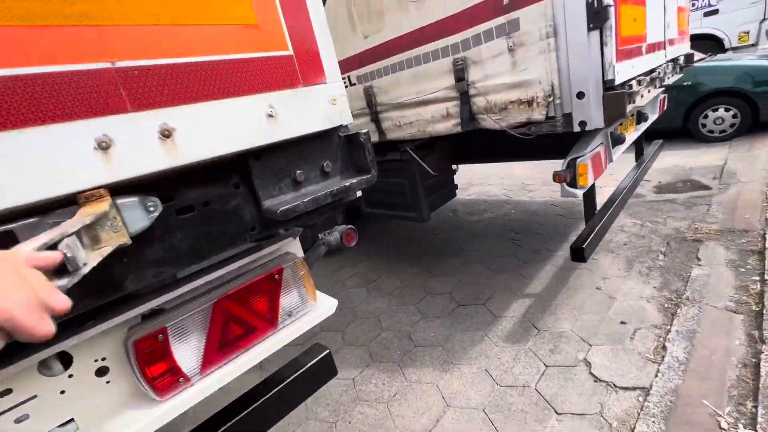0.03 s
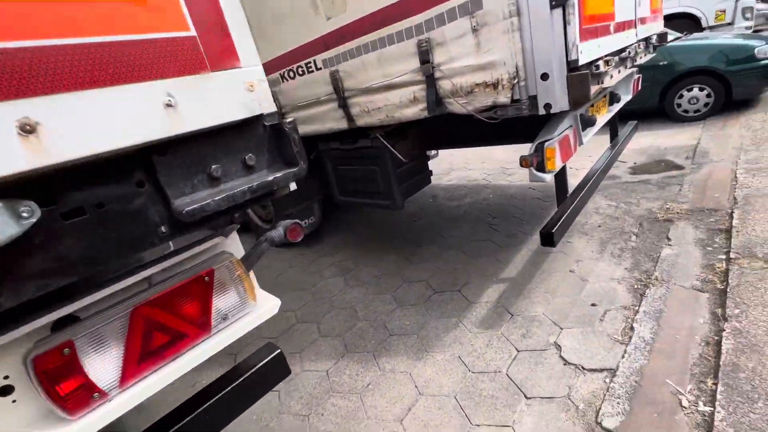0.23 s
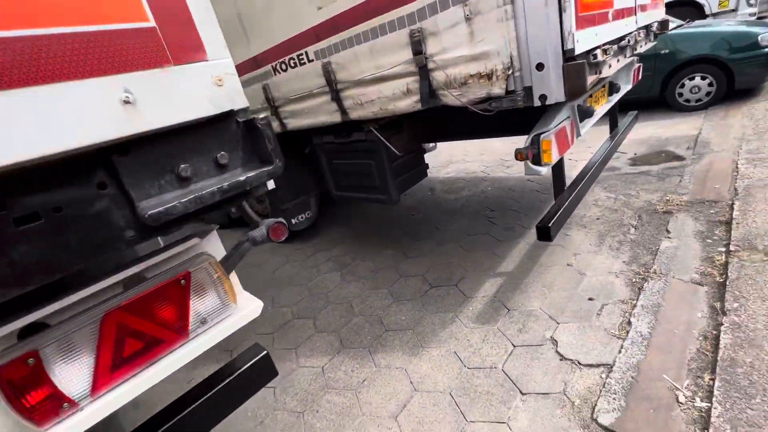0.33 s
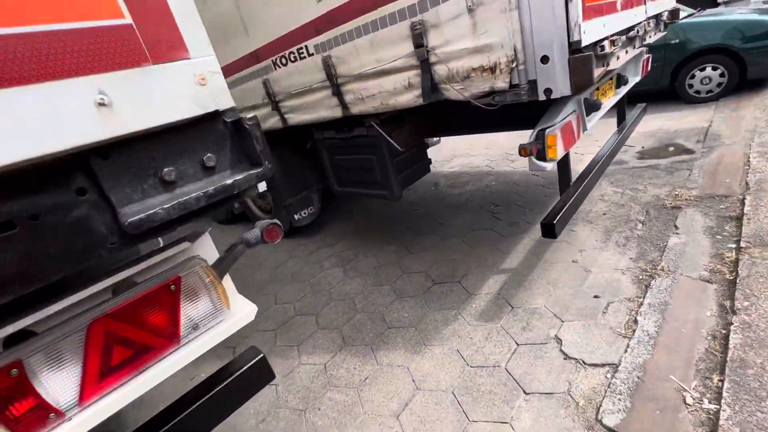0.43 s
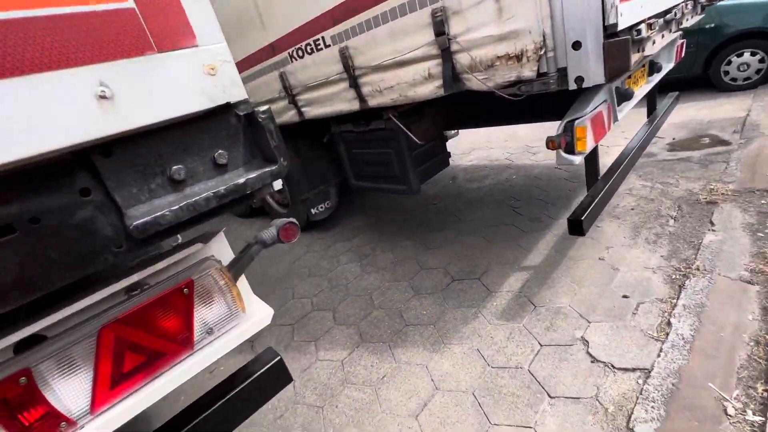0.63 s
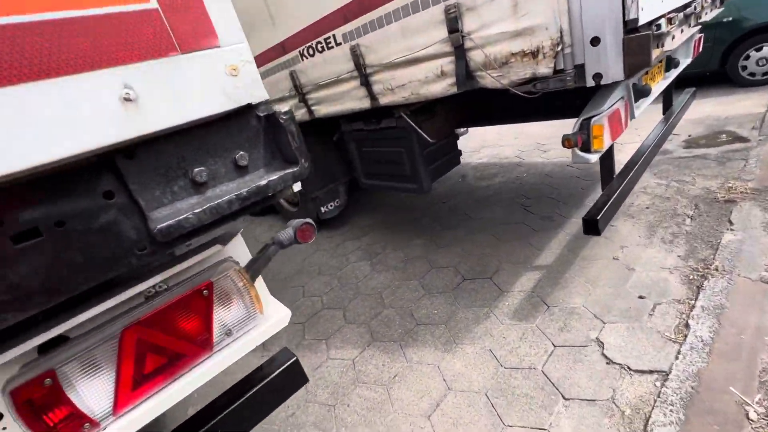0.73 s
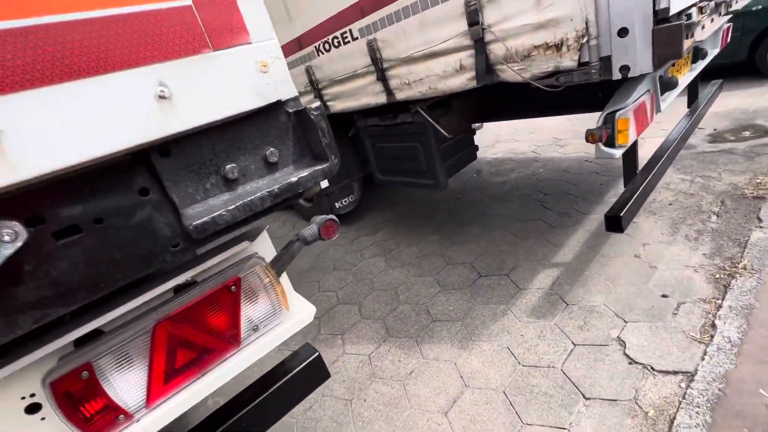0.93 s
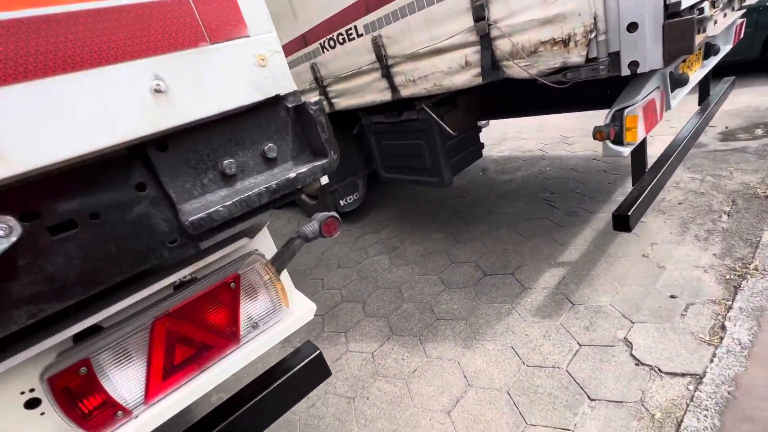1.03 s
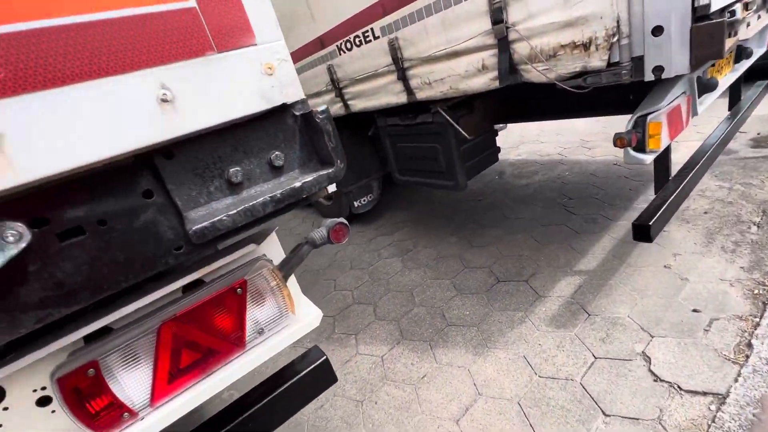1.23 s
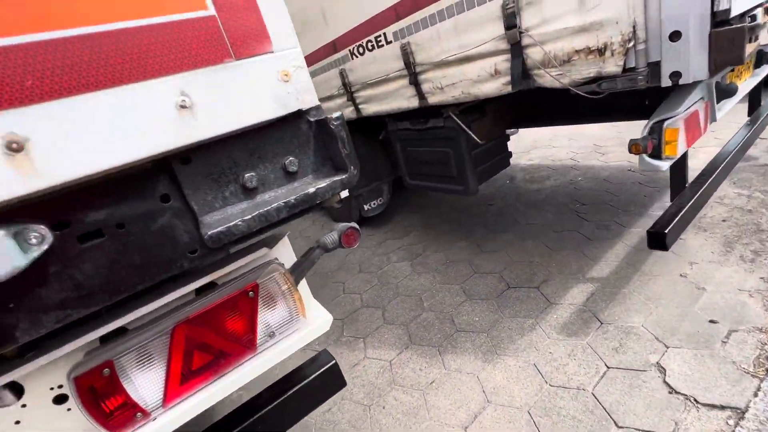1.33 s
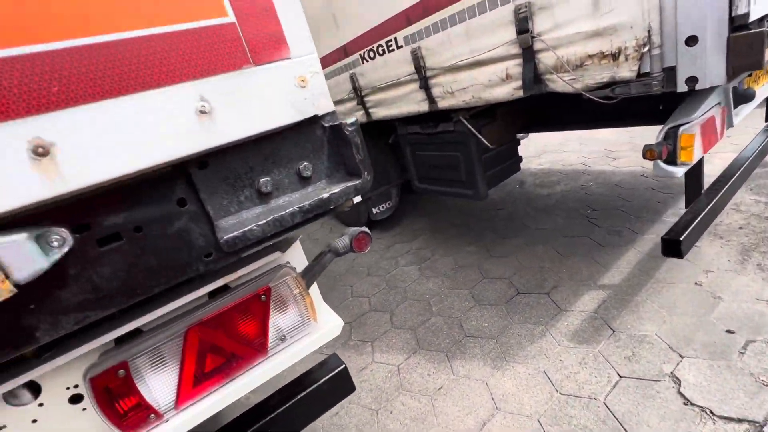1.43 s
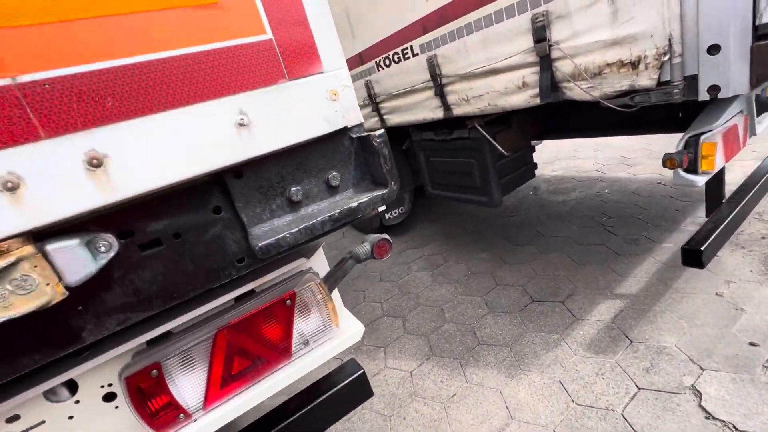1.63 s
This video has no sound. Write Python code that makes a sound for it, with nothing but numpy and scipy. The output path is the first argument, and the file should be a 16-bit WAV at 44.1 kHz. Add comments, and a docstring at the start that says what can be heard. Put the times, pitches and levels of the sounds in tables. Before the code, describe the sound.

A steel latch on a parked trailer's door is worked by hand, close by outdoors. Dull thuds and hard clanks lead to a low door boom and a gritty scuff, then fainter knocks over a low rumble.

```python
"""A latch on the rear door of a parked trailer is worked by hand, outdoors, close to two microphones.
Over a low rumble come a faint scuff, soft bumps and a small clink. Then dull thuds and hard steel
clanks excite the modes of the door panel, and the trailer and yard reverberate. Near half a second
the whole door booms at its lowest mode, and grit crackles under the heaviest scuff.
Lighter knocks and scuffs follow, growing fainter toward the end."""
import sys
import numpy as np
from scipy import signal
from scipy.fft import rfft, irfft, next_fast_len
from scipy.io import wavfile
from scipy.ndimage import uniform_filter1d, minimum_filter1d

SR = 44100
rng = np.random.default_rng(int(sys.argv[2]) if len(sys.argv) > 2 else 0)


def waveform_to_disk(signal):
    """Save audio, clipped to [-1, 1], as 16-bit WAV at the path in sys.argv[1]."""
    frames = np.transpose(np.atleast_2d(signal))
    scaled = np.clip(frames, -1, 1) * 32767
    samples = np.round(scaled).astype(np.int16)
    wavfile.write(sys.argv[1], SR, samples)


N = 74970

# Outdoor background: (frequency [Hz], relative spectral density [dB])
RUMBLE_SPECTRUM = [(20, -15), (35, -7.5), (58, -0.5), (120, 0), (200, -6.5), (400, -15.5), (700, -20.5),
                   (1200, -14.5), (2000, -32.5), (3500, -42), (8000, -48), (15000, -58.5)]
# Scuffs of movement: (time [s], duration [s], level [dB])
SCUFFS = [(-0.007, 0.14, -42.5), (0.504, .11, -32), (0.833, 0.13, -40), (1.042, 0.13, -46),
          (1.242, 0.11, -48.5), (1.334, 0.17, -41.5)]
# Friction noise: (frequency [Hz], relative spectral density [dB])
SCUFF_SPECTRUM = [(300, 23.5), (1200, 9), (3000, -6), (6500, -1), (9500, -7), (14000, -13.5), (16000, -15)]
# Cushioned blows: (time [s], frequency [Hz], envelope peak [dB], swell time [s])
THUDS = [(.001, 75, -27, 0.011), (0.042, 356, -32.5, 0.0042), (.056, 159, -29, 0.0057),
         (0.0691, 445, -26, 0.0015), (0.226, 319, -3.5, 0.00317), (0.249, 133, -24.5, 0.0126),
         (.237, 471, -9.5, 0.00278), (.258, 288, -10, 0.00349), (.266, 683, -9, 0.006475),
         (0.269, 1365, -17.5, 0.009), (0.292, 243, -11.5, 0.003), (.3, 136, -30, 0.011),
         (0.431, 894, -4.5, 0.002), (0.443, 185, -14.5, 0.0041), (.483, 343, -13.5, 0.0029),
         (.492, 125, -25, 0.0061), (.5742, 605, -15.5, 0.0017), (0.606, 145, -20.5, 0.0037),
         (.7105, 760, -13.5, .0017), (0.724, 450, -24.5, 0.0029), (0.747, 85, -29.5, 0.0092),
         (.9185, 485, -11.5, 0.0021), (0.956, 171, -33, .01), (.971, 356, -24.5, 0.0025),
         (1.0895, 474, -24, 0.00275), (1.096, 240, -35.5, 0.0033), (1.185, 150, -30, 0.0034),
         (1.233, 86.5, -32, 0.011), (1.273, 157, -26.5, 0.0049), (1.3625, 334, -22, 0.001),
         (1.409, 710, -21.5, .003), (1.464, 85, -30.5, 0.0081), (1.475, 259, -34.5, 0.0063),
         (1.563, 120, -42, 0.0085), (1.575, 61.5, -34, 0.015)]
# Door panel resonances: (frequency [Hz], relative level [dB], t60 [s])
PANEL_MODES = [(142.5, 7.5, 0.1), (208.4, -5.5, 0.89), (248, -10, 0.12), (280.8, 3.5, 0.32),
               (376.6, 1, 0.19), (451, -2.5, 0.25), (592, 5.5, 0.083), (699, 7.5, 0.097), (849, -1, .27),
               (1050, -13, 0.55), (1077, -9.5, 0.66), (1200, 4, 0.45)]
# Reverberation of trailer and yard: (frequency [Hz], t60 [s])
YARD_DECAY = [(100, .6), (400, 0.43), (1200, 0.63), (2300, 0.18), (10000, 0.6)]
# The clearest cracks of grit: (time [s], level [dB])
CRACKS = [(.037, -52), (.046, -50.5), (.07, -51), (.533, -37), (.5615, -40), (0.579, -43), (0.598, -46),
          (.668, -60), (0.685, -61), (.879, -51), (.893, -53), (1.655, -60)]
# Crackle of grit: (frequency [Hz], relative spectral density [dB])
GRIT_SPECTRUM = [(2000, -21), (6500, -9), (10000, 7), (13500, -7), (15500, -4), (17000, -15.5)]
# Resonances of a small steel part: (frequency [Hz], relative level [dB], t60 [s])
CLINK_MODES = [(2150, -1, .035), (3100, 4, .045), (3850, -2, 0.051), (4900, -4.5, 0.032),
               (5810, -4.5, 0.045), (6820, -8, .02)]
# Steel impacts, in four bands: (time [s], body [dB], clank [dB], edge [dB], tick [dB], t60 [s])
CLANKS = [(0.2228, -24.5, -19, -33, -44, 0.3), (0.261, -17, -15.5, -33, -46.5, .12),
          (0.276, -39, -19, -37.5, -45, 0.24), (.3418, -34, -19, -25.5, -42, 0.034),
          (.352, -29, -24.5, -44.5, -48.5, 0.27), (0.4311, -22.5, -10, -22.5, -38.5, 0.1),
          (.459, -17.5, -11, -14.5, -34, 0.099), (.497, -26.5, -13.5, -39.5, -53, 0.1),
          (0.514, -35, -17.5, -46, -59.5, .07), (.5745, -25.5, -22, -37.5, -41.5, 0.076),
          (0.7114, -31, -29, -46.5, -62, 0.17), (.8815, -25, -23, -23, -51, 0.1),
          (.892, -25, -17, -34.5, -44.5, 0.13), (0.949, -37.5, -32, -63, -62, 0.27),
          (1.097, -28, -35.5, -52, -48, 0.052), (1.403, -33.5, -35, -47, -55.5, 0.37)]
# Steel latch resonances: (frequency [Hz], relative level [dB], t60 [s])
LATCH_MODES = [(1453, -3, 0.14), (1745, -2.5, .17), (2050, -11, 0.035), (2304, -3, 0.09), (2670, -9, 0.046),
               (2853, -14.5, 0.17)]
# Flexing of the whole door: (time [s], level [dB])
BOOMS = [(0.486, -22.5), (.565, -25.5)]
# Likeness of the two channels: (frequency [Hz], coherence before clipping [1])
COHERENCE = [(50, 0), (250, 1.7), (700, 0.72), (1500, 0.44), (2500, 0.05), (5000, -0.56), (9000, 0.9),
             (11000, 7.5), (15000, 4.5)]
# Phase between the channels: the left leads in the lows and mids; near 11 kHz the recorder's
# stereo processing puts them in opposite phase: (frequency [Hz], phase [rad])
CHANNEL_PHASE = [(20, -0.5), (170, 1.09), (350, 0.83), (690, 2.5), (1300, 3), (1700, 5), (2100, 7),
                 (2600, 6), (3530, 12), (7500, 15.5), (9500, 20.5), (11000, 22), (12400, 19.5), (15000, 20)]
# Right channel relative to the left: (frequency [Hz], gain [dB])
RIGHT_GAIN = [(50, -1.5), (300, -3.5), (900, -3), (2200, -3), (3500, -3.5), (6000, -13), (8000, -7.5),
              (10000, -2), (15000, -0.5)]

LN_1000 = np.log(1000)  # a decay of 60 dB, in nepers


def amp(db):
    """The decibel scale: 20 dB is a tenfold amplitude."""
    return 10 ** (np.asarray(db) / 20)


def unit_rms(x):
    """Normalisation to a mean power of one."""
    return x / np.sqrt(np.mean(x ** 2) + 1e-20)


def curve_at(points, hz):
    """Linear interpolation on a log-frequency axis."""
    knots_hz, values = np.transpose(points)
    return np.interp(np.log(hz + 1), np.log(knots_hz), values)


def add(mix, start_s, sound):
    """Superposition: a sound adds to the mix from its onset."""
    part = mix[:, max(round(start_s * SR), 0):][:, :sound.shape[-1]]
    part += sound[..., :part.shape[-1]]


def colour(x, spectrum, size=4096):
    """Minimum-phase filtering: the Hilbert transform of the log gain sets the phase."""
    log_gain = np.log(amp(curve_at(spectrum, abs(np.fft.fftfreq(size, 1 / SR)))))
    response = np.exp(np.conj(signal.hilbert(log_gain)))
    taps = np.fft.ifft(response).real[:size // 2]
    return signal.fftconvolve(x, taps[None], axes=1)[:, :x.shape[1]]


def struck_modes(modes, t):
    """Free vibration: a sum of damped sinusoids, here in random phase."""
    return sum(amp(db - 60 * t / t60) * np.sin(2 * np.pi * (hz * t + rng.random((2, 1))))
               for hz, db, t60 in modes)


def rumble(level_db=-42, drift_db_per_s=-2):
    """Ambient noise: a random signal with its power at low frequencies, slowly fading."""
    t = np.arange(N) / SR
    gain = amp(curve_at(RUMBLE_SPECTRUM, np.fft.rfftfreq(N, 1 / SR)))
    noise = irfft(rfft(rng.standard_normal((2, N))) * gain, N)
    return unit_rms(noise) * amp(level_db + drift_db_per_s * (t - t.mean()))


def scuffs(grain_db=4):
    """Sliding friction: tiny contacts of uneven strength merge into short swells of noise."""
    t = np.arange(N) / SR
    grains = rng.standard_normal((2, N)) * amp(grain_db * np.minimum(rng.exponential(1, N), 5))
    swells = sum(amp(db) * np.sin(np.pi * np.clip((t - start_s) / length_s, 0, 1))
                 for start_s, length_s, db in SCUFFS)
    return unit_rms(colour(grains, SCUFF_SPECTRUM)) * swells


def thud(hz, db, swell_s):
    """Cushioned impact: a heavily damped oscillation swells and dies, in the direct row only."""
    t = np.arange(SR // 5) / SR
    envelope = (t / swell_s * np.exp(1 - t / swell_s)) ** 2
    return amp(db) * envelope * np.sin(2 * np.pi * hz * (t - swell_s)) * np.array([[1], [0]])


def door_panel(blows, gain_db=-10):
    """Resonance: the blows drive the panel's normal modes, which ring on after them."""
    t = np.arange(SR) / SR
    modes = sum(amp(db) * np.exp((2j * np.pi * hz - LN_1000 / t60) * t) for hz, db, t60 in PANEL_MODES)
    impulse_response = modes.real * 200 / SR
    return amp(gain_db) * signal.fftconvolve(blows, impulse_response[None], axes=1)[:, :N]


def yard(blows, gain_db=-7.5, rise_s=0.005):
    """Reverberation: diffuse reflections of the direct blows decay at each band's own rate."""
    hz, t, noise = signal.stft(rng.standard_normal((2, SR)), SR, nperseg=256)
    fade = np.exp(-LN_1000 * t / curve_at(YARD_DECAY, hz)[:, None]) * (1 - np.exp(-t / rise_s))
    band_energy = np.sum(fade ** 2, axis=1, keepdims=True) * t[1] * SR
    tail = signal.istft(noise * fade / np.sqrt(band_energy), SR, nperseg=256)[1]
    return amp(gain_db) * signal.fftconvolve(blows[:1], tail, axes=1)[:, :N]


def grit(from_s=0.45, to_s=0.66, peak_per_s=220, fine_db=-52.5, fine_t60=0.0035, clear_t60=0.015):
    """Shot noise: tiny random cracks under the heaviest scuff, and clearer ones at set times."""
    t = np.arange(N) / SR
    arch = np.sqrt(abs(np.sin(np.pi * np.clip((t - from_s) / (to_s - from_s), 0, 1))))
    impulses = (rng.random(N) < arch * peak_per_s / SR) * rng.uniform(0.45, 1, N) * arch
    fine = amp(fine_db) * signal.lfilter([1], [1, -np.exp(-LN_1000 / (fine_t60 * SR))], impulses)
    clear = sum(amp(db) * (t > start_s) * np.exp(-LN_1000 * abs(t - start_s) / clear_t60)
                for start_s, db in CRACKS)
    return (fine + clear) * unit_rms(colour(rng.standard_normal((2, N)), GRIT_SPECTRUM))


def clink(gain_db=-41):
    """Impulse excitation: a light touch sets a small steel part ringing at its high modes."""
    return amp(gain_db) * struck_modes(CLINK_MODES, np.arange(SR // 5) / SR)


def clank(body_db, clank_db, edge_db, tick_db, t60, contact_s=0.00029):
    """Hard impact of steel: the fittings' dense modes overlap as noise; the latch's stay distinct."""
    t = np.arange(SR // 3) / SR
    ring = rng.choice([-1., 1.], (2, len(t))) * np.exp(-LN_1000 * t / t60)
    levels = [(264, body_db), (875, clank_db), (2160, edge_db), (3750, tick_db)]  # band centres in Hz
    bands = [(hz, db + 10 * np.log10(SR / 2 / hz)) for hz, db in levels]  # level to spectral density
    body, _, edge, tick = (db for hz, db in bands)
    bass_skirt = [(25, body - 55.5), (70, body - 28), (150, body - 12)]
    treble_skirt = [(2900, edge - 8), (7000, tick - 5), (12000, tick - 21.5)]
    fittings = colour(ring, sorted(bass_skirt + bands + treble_skirt))
    latch = amp(edge_db - 8) * struck_modes(LATCH_MODES, t)
    return (fittings + latch) * (1 - np.exp(-t / contact_s))


def door_booms(hz=63.2, t60=0.36, rise_s=0.003):
    """Fundamental mode: the whole door flexes as one damped oscillator."""
    t = np.arange(SR) / SR
    envelope = (1 - np.exp(-t / rise_s)) * np.exp(-LN_1000 * t / t60)
    sway = envelope * np.sin(2 * np.pi * hz * t)
    booms = np.zeros((2, N))
    for start_s, db in BOOMS:
        add(booms[:1], start_s, amp(db) * sway)
    return booms


def microphones(sound):
    """Partial coherence: the left faces the door; the right is weaker, phase-shifted, part diffuse."""
    size = next_fast_len(N + SR // 4)
    hz = np.fft.rfftfreq(size, 1 / SR)
    direct, diffuse = rfft(sound, size)
    coherence = np.clip(curve_at(COHERENCE, hz), 0, 0.96)
    blend = coherence * direct + np.sqrt(1 - coherence ** 2) * diffuse
    right = blend * amp(curve_at(RIGHT_GAIN, hz)) * np.exp(-1j * curve_at(CHANNEL_PHASE, hz))
    return irfft(np.array([direct, right]), size)[:, :N]


def scene():
    """Superposition: blows, resonance, reverberation and background sum at the microphones."""
    blows = np.zeros((2, N))  # rows: direct sound, diffuse share
    for start_s, *blow in THUDS:
        add(blows, start_s, thud(*blow))
    for start_s, *blow in CLANKS:
        add(blows, start_s, clank(*blow))
    add(blows, start_s=0.1857, sound=clink())
    door = blows + door_panel(blows) + yard(blows) + door_booms()
    return microphones(door + scuffs() + grit() + rumble())


def record(dry, ceiling=0.93, cutoff_hz=15800):
    """Peak limiting and band limiting: the gain dips at the loudest peaks, then a low-pass follows."""
    needed_gain = ceiling / np.maximum(abs(dry).max(0), ceiling)
    smooth_gain = uniform_filter1d(minimum_filter1d(needed_gain, size=221), size=221)  # 5 ms windows
    low_pass = signal.firwin(511, cutoff_hz, window=("kaiser", 9), fs=SR)
    return signal.oaconvolve(dry * smooth_gain, low_pass[None], "same")


dry = scene()
out = record(dry)
waveform_to_disk(out)
```